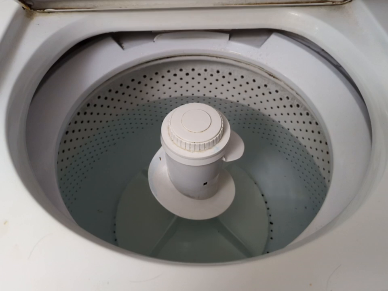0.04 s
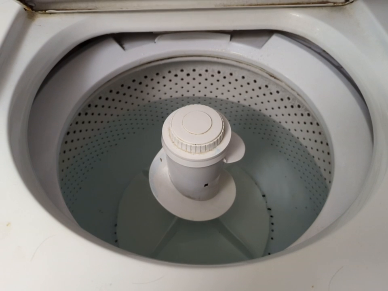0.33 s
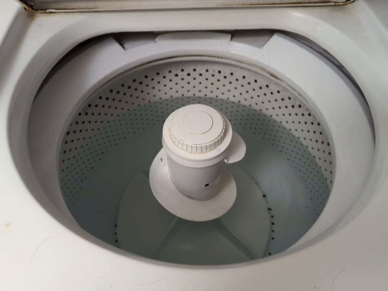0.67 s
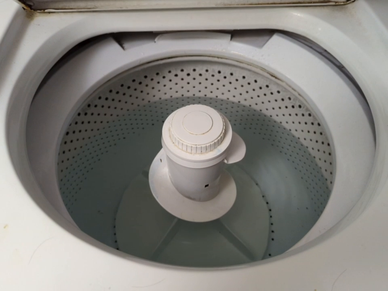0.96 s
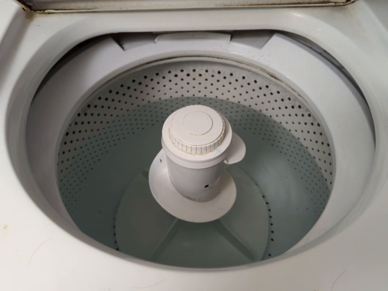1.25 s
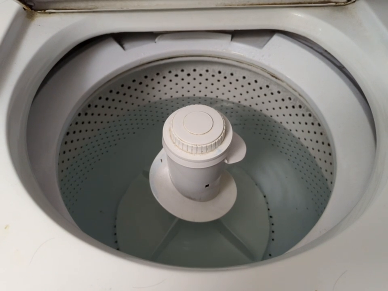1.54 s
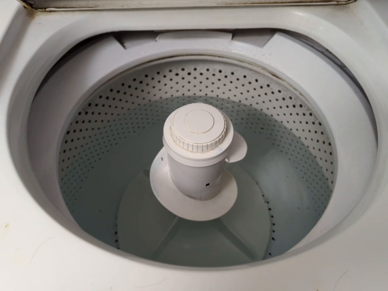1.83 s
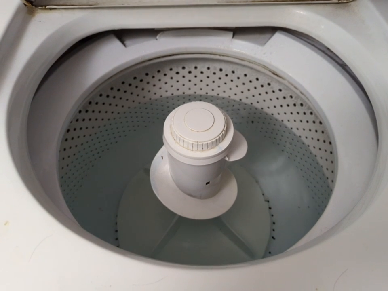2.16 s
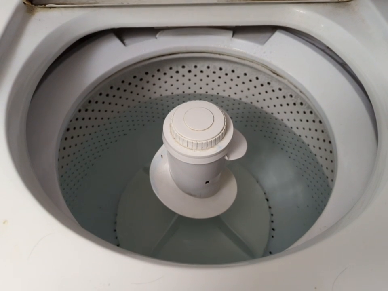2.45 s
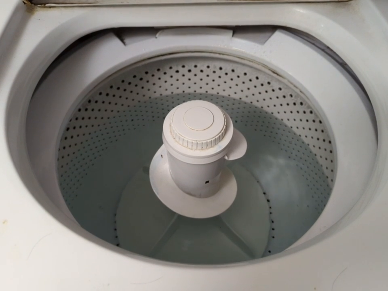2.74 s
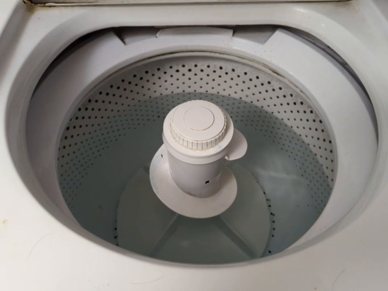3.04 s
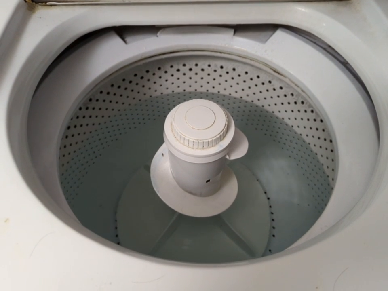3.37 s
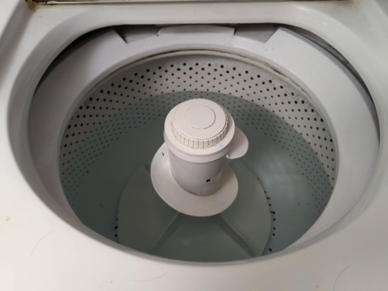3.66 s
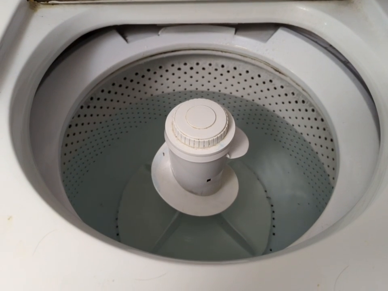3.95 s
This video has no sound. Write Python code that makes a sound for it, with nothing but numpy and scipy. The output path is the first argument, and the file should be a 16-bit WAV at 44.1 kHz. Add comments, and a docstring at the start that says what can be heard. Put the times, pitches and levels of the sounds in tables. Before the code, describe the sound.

Close above its open, water-filled tub, a washing machine hums steadily in a small room, its pump rushing and its belt bumping softly. Two quick drips fall partway through, the bearings scrape lightly, and the water stirs near the end.

```python
"""A small room, just above the open, water-filled tub of a top-loading washing machine.
The motor hums at twice the mains frequency and beats against tones from its shaft; on every turn
the belt bumps the tub and cabinet. The pump rushes, its housing whirrs, the bearings scrape now
and then. Two drops ping in the water, which stirs near the end. The sound cuts in after a silence."""
import sys
import numpy as np
from scipy import signal
from scipy.fft import rfft, irfft
from scipy.io import wavfile
from scipy.ndimage import map_coordinates

SR = 44100
rng = np.random.default_rng(int(sys.argv[2]) if len(sys.argv) > 2 else 0)


def bounce(signal):
    """Save signal as a 16-bit WAV file at the path given by the first command-line argument."""
    frames = np.transpose(np.atleast_2d(signal))
    limited = np.clip(frames, -1, 1)
    pcm = np.round(limited * 32767).astype(np.int16)
    wavfile.write(sys.argv[1], SR, pcm)


N = 176400
BIN_HZ = np.arange(N // 2 + 1) * SR / N
MAINS_HZ, SHAFT_HZ, BELT_TURN_S = 60, 29.3, .3335
RIGHT_LAG_S = 0.000206  # the machine's sound arrives later on the right


def motor(t, throb_db, scrape_db):
    """Beating: magnetic hum adds to close sidebands from shaft and belt; shaft tones and whine lie above."""
    # hum and sidebands: multiples of mains, shaft and belt rate that sum to the tone's frequency,
    # level/dB, left-right/dB, flutter/dB, swell per belt turn/dB
    hum = [(2, 0, 0, -28, 2.5, 0.76, 0), (4, 0, 0, -41.5, -1.5, 0.57, 2), (4, 1, 0, -53, 6, 2.2, 0),
           (4, 1, -1, -59, 1, 1.5, 0.47), (6, 0, 0, -63, -12, 1.5, -1), (16, 0, 0, -54.5, 2.5, 1.1, 0),
           (20, 0, 0, -62.5, 10, 1.5, 2)]
    # low tones that throb against the hum: same columns
    throb = [(2, 1, 0, -32.5, 0.9, 1.5, 0), (2, 1, -1, -40.5, 0.92, 0.85, 0), (2, 1, 2, -48, 1, 1.8, 0),
             (0, 6, 0, -42, 0, 1.5, 0.86), (0, 6, -2, -48, 0, 0.87, 0)]
    # shaft harmonics: multiple of the shaft rate, level/dB, left-right/dB
    shaft_tones = [(3, -64, 1), (25, -55, 0), (27, -64.5, 5), (50, -58, 10), (57, -54.5, 9.5)]
    in_step_s, belt_peak_s, growth_db_per_s = 1.017, 2.075, .5
    mains = 2 * np.pi * MAINS_HZ * (t - in_step_s)
    shaft = 2 * np.pi * SHAFT_HZ * (t - in_step_s) + 0.0079 * walk(5.5)
    belt = 2 * np.pi * (t - belt_peak_s) / BELT_TURN_S
    out = 0
    for tones, level_db in (hum, 0), (throb, throb_db):
        for n_mains, n_shaft, n_belt, db, side_db, flutter_db, swell_db in tones:
            size = undb(db + level_db + swell_db * np.cos(belt) + flutter_db * walk(9.2))
            phase = round(n_mains) * mains + round(n_shaft) * shaft + round(n_belt) * belt
            out += pan(side_db) * size * np.cos(phase)
    for n_shaft, db, side_db in shaft_tones:
        out += pan(side_db) * undb(db + 0.5 * walk(6)) * np.cos(round(n_shaft) * shaft)
    out += whine(t, scrape_db)
    return np.sqrt(2) * undb(growth_db_per_s * (t - t.mean())) * out


def whine(t, scrape_db, hz=1910, flutter_hz=20):
    """Random phase and amplitude modulation roughen a thin motor tone that swells with each scrape."""
    ahead = t + np.array([[0], [RIGHT_LAG_S]])  # so that it arrives on both sides together
    tone = np.sin(2 * np.pi * hz * ahead + .6 * walk(flutter_hz))
    level_db = -51.5 + 0.5 * scrape_db + 4 * walk(flutter_hz)
    return pan(.5) * undb(level_db) * tone


def belt_bumps(t):
    """Periodic forcing: boom, knock and rush swell (in dB) as the belt's stiff spots pass the pulley."""
    # stiff spots: t/s of one passage, half-width/s, boom/dB, knock/dB, rush/dB
    bumps = [(0.402, 0.033, 3, 2, 1.9), (0.588, 0.038, 0.5, 3, 1.5)]
    swell = 0
    for at, width, *db in bumps:
        away = (t - at + BELT_TURN_S / 2) % BELT_TURN_S - BELT_TURN_S / 2
        swell += np.outer(db, np.exp(-(away / width) ** 2))
    return swell


def belt_noise(repeat):
    """Partly periodic excitation: the share `repeat` of the roughness's power recurs on every turn."""
    turn = np.resize(rng.standard_normal(int(BELT_TURN_S * SR)), N)
    return np.sqrt(repeat) * turn + np.sqrt(1 - repeat) * rng.standard_normal(N)


def tub(boom_db, knock_db):
    """Forced vibration: shaken by the belt, the full tub booms and the sheet-metal cabinet knocks."""
    # response of the tub: f/Hz, level/dB
    tub_response = [(20, -32), (40, -30), (60, -24), (100, -16), (135, -11.5), (153, 2.5), (172, 1),
                    (190, -10), (225, -11.5), (280, -15.5), (400, -45.5)]
    # response of the cabinet: f/Hz, level/dB
    cabinet_response = [(200, -13.5), (310, -5.5), (350, 3.5), (398, -7), (430, 0.5), (465, -4.5),
                        (515, -1.5), (620, -11), (1000, -11), (2000, -54.5)]
    boom = unit(colour(belt_noise(repeat=0.33) * undb(boom_db), tub_response))
    shake = belt_noise(repeat=0.44) + 0.14 * np.array([[1], [-1]]) * belt_noise(repeat=0.44)
    knock = unit(colour(shake * undb(knock_db), cabinet_response))
    return pan(1.8) * undb(-40) * boom + undb(-46) * knock


def thuds(t, attack_s=0.0061, decay_s=0.021, split_hz=450):
    """Damped modes: each soft thud of the belt is shared differently between low and high panel modes."""
    # belt thuds: t/s, level of the low modes/dB, level of the high modes/dB
    pushes = [(.744, -40, -39.5), (1.081, -36.5, -48), (1.403, -41, -44), (1.595, -44, -44),
              (1.743, -44, -36.5), (2.078, -42, -39), (2.409, -42.5, -45), (2.752, -40, -43),
              (3.082, -41.5, -40), (3.408, -36, -40), (3.744, -36, -37.5)]
    # modes of the cabinet panels: f/Hz, relative level/dB
    modes = [(287, -5.5), (348, 1), (385, -9.5), (430, -6.5), (492, -0.5), (528, -1), (570, -5.5),
             (625, -5)]
    out = np.zeros(N)
    for at, low_db, high_db in pushes:
        near = np.abs(t - at) < BELT_TURN_S
        age = t[near] - at
        envelope = np.exp(-np.maximum(-age / attack_s, age / decay_s))
        for hz, db in modes:
            size = undb(db + (low_db if hz < split_hz else high_db))
            cycles = hz * (1 + .02 * rng.standard_normal()) * age + rng.random()
            out[near] += size * envelope * np.sin(2 * np.pi * cycles)
    return out


def pump(t, bump_db, coherent_below_hz=910):
    """A diffuse field, coherent only in the bass: the rush flickers and pulses with shaft, mains and belt."""
    # rush of pump and bearings: f/Hz, relative spectral level/dB
    spectrum = [(25, -10.5), (60, -3), (300, -1), (600, 0), (830, -2.5), (1080, 0.5), (1200, -0.5),
                (1370, -2), (1650, 0), (1790, 0.5), (1920, 1.5), (2100, 2), (2400, -0.5), (2850, -2.5),
                (3200, -3.5), (4400, -6), (5300, -10), (6200, -4.5), (7000, -10.5), (8200, -14),
                (9100, -13.5), (9550, -16), (10150, -12.5), (11000, -17), (12200, -13.5), (13300, -18.5),
                (15300, -18.5)]
    # its balance: f/Hz, left-right/dB
    balance = [(300, 3.5), (700, -1), (1250, 5.5), (1650, 3.5), (1950, 3), (2400, 4.5), (3600, -0.5),
               (4500, -7), (6200, -5.5), (7600, 1.5), (15000, 0)]
    coherence = 1 / (1 + (BIN_HZ / coherent_below_hz) ** 2) ** 2
    common = np.sqrt(coherence) * rfft(rng.standard_normal(N))
    separate = np.sqrt(1 - coherence) * rfft(rng.standard_normal((2, N)))
    noise = irfft((common + separate) * pan(on_bins(balance)), N)
    rush = unit(colour(noise, spectrum))
    pulsing_part = colour(rush, [(2600, -5.5), (4500, -3.5)])
    chafe_db = .7 * np.sin(2 * np.pi * SHAFT_HZ * t)
    buzz_db = .35 * np.cos(2 * np.pi * 4 * MAINS_HZ * t)
    flicker_db = walk(45)
    gain = undb(bump_db + chafe_db + buzz_db + flicker_db)
    return undb(-38) * unit(rush + pulsing_part * (gain - 1))


def whirr():
    """Resonance: the pump keeps narrow bands of the housing ringing, in a different phase on each side."""
    # housing resonances: f/Hz, bandwidth/Hz, level/dB, left-right/dB
    resonances = [(599.3, 11, -67, 2), (775, 30, -69, 0), (900, 40, -66, 0), (1029, 39, -57.5, 8.5),
                  (1210, 53, -54, 4), (1295, 30, -62, 1), (1469, 43, -58, 7), (1635, 53, -54, 8.5),
                  (2028, 30, -56, 1), (2255, 54, -56, 0), (2389, 55, -53, 2), (2600, 22, -60, 3)]
    drive = rfft(rng.standard_normal(N))
    out = 0
    for hz, width, db, side_db in resonances:
        band = drive / (1 + ((BIN_HZ - hz) / (width / 2)) ** 4)
        phase = np.exp(2j * np.pi * rng.random((2, 1)))
        out += pan(side_db) * undb(db) * unit(irfft(band * phase, N))
    return out


def bearings(t, scrape_db):
    """Dry friction excites a few resonances; the rubbing wavers and chafes on each turn of the shaft."""
    # rubbing of the bearings: f/Hz, relative spectral level/dB
    spectrum = [(900, -38), (1400, -6), (1660, -1), (1790, -9), (1910, -1.5), (2100, -6), (2390, -1.5),
                (2800, -23), (4000, -36)]
    rub = unit(colour(rng.standard_normal((2, N)), spectrum))
    chafe_db = 2 * np.sin(2 * np.pi * SHAFT_HZ * t)
    return pan(2.5) * undb(-48.5 + scrape_db + chafe_db + 2 * walk(26)) * rub


def drops(t, rise_s=0.00054, splash_s=0.0046, echo_t60_s=0.16):
    """Bubble resonance: each drop traps a little air that pings, with a splash and the tub's echo."""
    # drops: t/s, bubble f/Hz, ping level/dB, decay time/s, splash level/dB
    impacts = [(1.5712, 3420, -19.5, .0023, -44), (1.7064, 3770, -18.5, .0022, -32)]
    out = np.zeros((2, N))
    for at, hz, db, decay, splash_db in impacts:
        age = np.clip(t - at, 0, None)
        onset = 1 - np.exp(-age / rise_s)
        ping = undb(db) * np.sin(2 * np.pi * hz * age) * np.exp(-age / decay)
        splash = undb(splash_db) * np.exp(-age / splash_s) * rng.standard_normal((2, N))
        out += onset * (ping + splash)
    tail = rng.standard_normal((2, N)) * np.exp(-np.log(1000) * t / echo_t60_s)
    echo = signal.fftconvolve(out, unit(tail) / np.sqrt(N), axes=-1)[:, :N]
    return out + undb(-3.5) * echo


def stirs(t):
    """Band-limited noise under a bell-shaped envelope: the water stirs in soft, short washes."""
    # washes: t/s, half-width/s, centre f/Hz, level/dB
    washes = [(3.84, 0.069, 870, -41), (3.9, .012, 5020, -39.5)]
    out = 0
    for at, width, hz, db in washes:
        band = [(hz / 2, -22), (hz, 0), (hz * 2, -22), (hz * 4, -50)]
        wash = unit(colour(rng.standard_normal((2, N)), band))
        out += undb(db) * np.exp(-((t - at) / width) ** 2) * wash
    return out


def undb(db):
    return 10 ** (np.asarray(db) / 20)


def unit(x):
    return x / np.sqrt(np.mean(x ** 2))


def pan(db):
    """Left and right gains for a level difference."""
    return undb(np.array([[1], [-1]]) * db / 2)


def on_bins(points):
    """Interpolation of (f/Hz, value) at every bin, on a logarithmic frequency axis."""
    hz, value = np.array(points, float).T
    return np.interp(np.log(BIN_HZ + 1), np.log(hz), value)


def colour(x, points):
    """Filtering by a response of (f/Hz, level/dB)."""
    return irfft(rfft(x) * undb(on_bins(points)), N)


def walk(rate_hz):
    """Low-pass noise: a smooth random wander with a spread of 1."""
    low_pass = np.exp(-(BIN_HZ / rate_hz) ** 2) * (BIN_HZ > 0)
    return unit(irfft(rfft(rng.standard_normal(N)) * low_pass, N))


def scene():
    """Superposition of machine and water; shared swells tie the machine's parts together."""
    # slow rise of the machine's noise: t/s, level/dB
    noise_level = [(.41, -2), (.7, -0.8), (1.5, 0.05), (2.0, 0.23), (3.0, 1), (4.0, 1.5)]
    # swell of the throbbing tones and the tub's boom: t/s, level/dB
    throb_level = [(.41, -2.5), (.6, 1.5), (.76, -5), (.97, 1), (1.16, -2.5), (1.3, 1), (1.42, 1),
                   (1.5, -13.5), (1.62, 3.5), (1.75, 0), (1.82, -6), (1.92, 2), (2.2, -3.5), (2.75, 1),
                   (3.02, -2.5), (3.2, 1.5), (3.32, -4), (3.55, 1.5), (3.72, -4), (3.87, 3.5), (4, -3.5)]
    # scrapes of the bearings: t/s, half-width/s, swell/dB
    scrapes = [(0.73, 0.017, 10.5), (1.333, .018, 5), (1.896, .025, 8), (2.026, 0.016, 10),
               (2.082, 0.032, 8), (2.24, 0.027, 8), (2.344, .018, 8), (2.605, 0.03, 8), (2.69, 0.027, 9),
               (2.773, 0.03, 8.5), (2.945, .03, 5.5), (3.1, .035, 2), (3.34, 0.021, 11),
               (3.415, 0.026, 6.5), (3.9, 0.03, 2.5)]
    t = np.arange(N) / SR
    boom_db, knock_db, rush_db = belt_bumps(t)
    noise_gain = undb(np.interp(t, *np.array(noise_level).T))
    throb_db = np.interp(t, *np.array(throb_level).T)
    scrape_db = sum(db * np.exp(-((t - at) / width) ** 2) for at, width, db in scrapes)
    noise = tub(boom_db + throb_db, knock_db) + pump(t, rush_db) + whirr() + bearings(t, scrape_db)
    left, right = motor(t, throb_db, scrape_db) + noise_gain * noise + thuds(t)
    right = map_coordinates(right, [(t - RIGHT_LAG_S) * SR], order=5, mode="mirror")
    return np.array([left, right]) + drops(t) + stirs(t)


def record(dry):
    """Gating and band limiting: the sound cuts in abruptly and its highest treble is removed."""
    start_s, rise_s, top_hz = .412, 0.0014, 15550
    gate = np.clip((np.arange(N) / SR - start_s) / rise_s, 0, 1)
    low_pass = signal.ellip(10, .1, 80, top_hz, fs=SR, output="sos")
    return signal.sosfilt(low_pass, dry * gate)


dry = scene()
out = record(dry)
bounce(out)
```